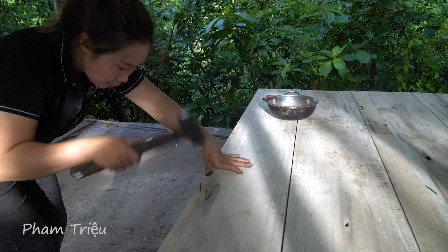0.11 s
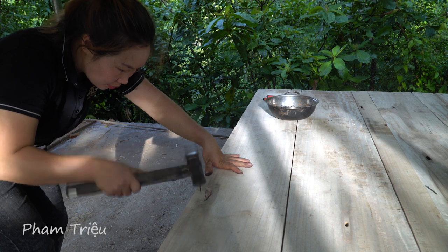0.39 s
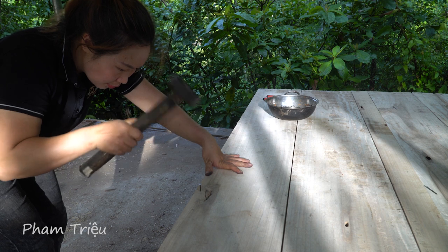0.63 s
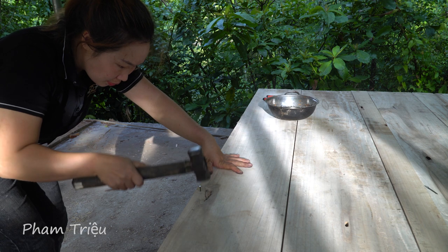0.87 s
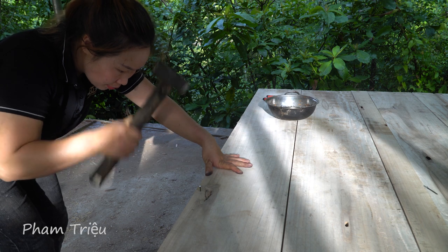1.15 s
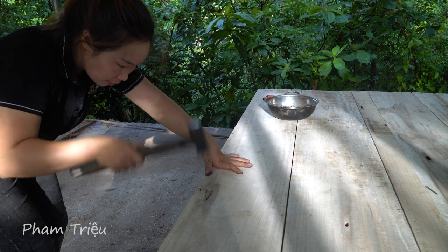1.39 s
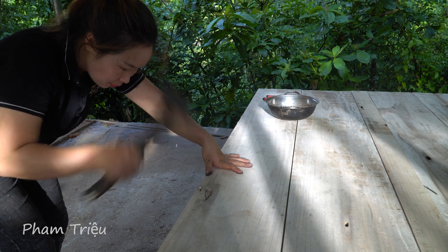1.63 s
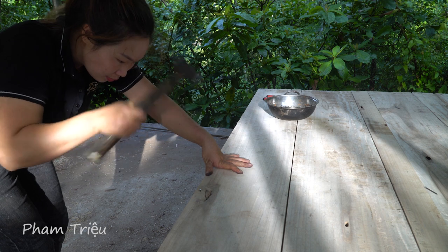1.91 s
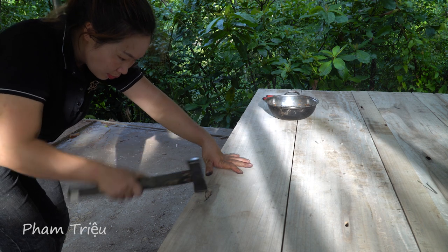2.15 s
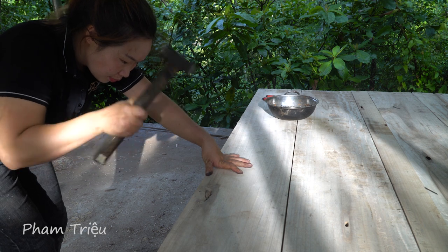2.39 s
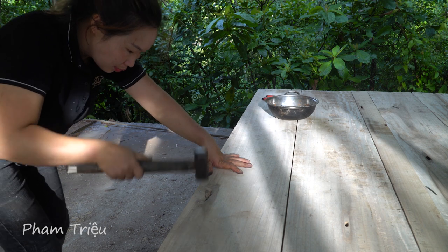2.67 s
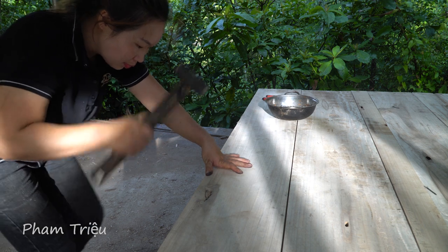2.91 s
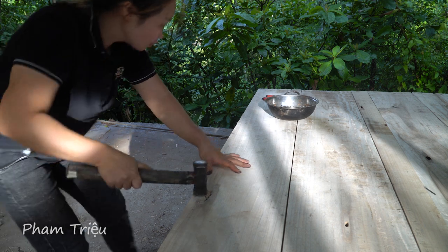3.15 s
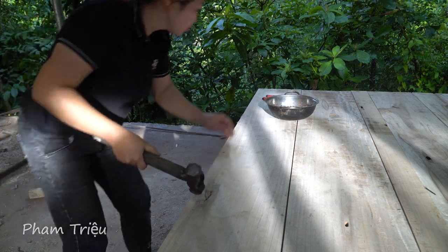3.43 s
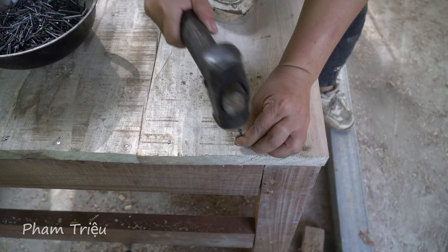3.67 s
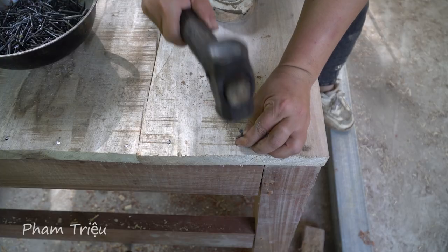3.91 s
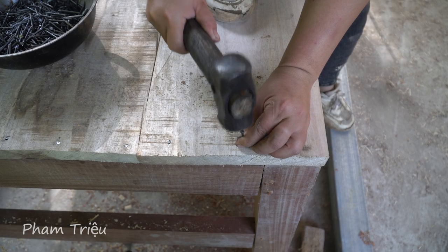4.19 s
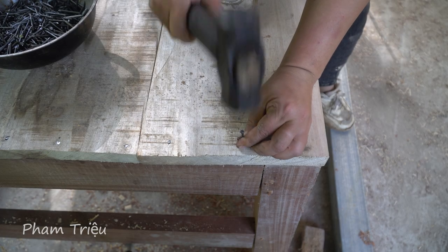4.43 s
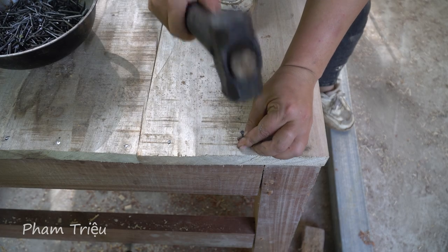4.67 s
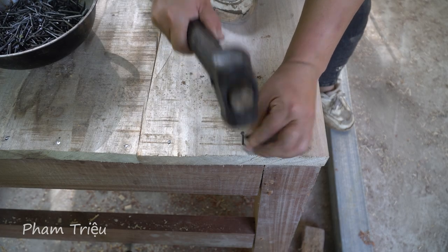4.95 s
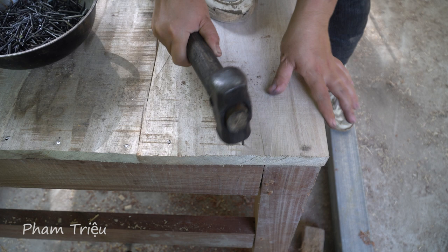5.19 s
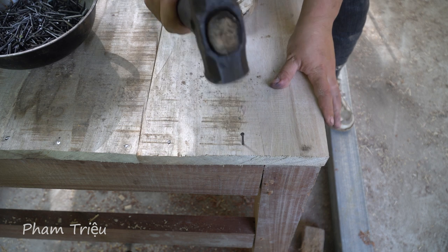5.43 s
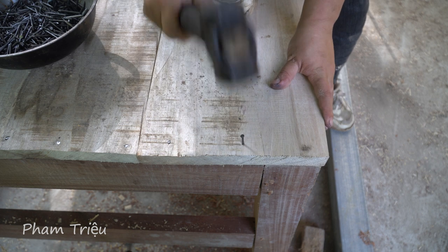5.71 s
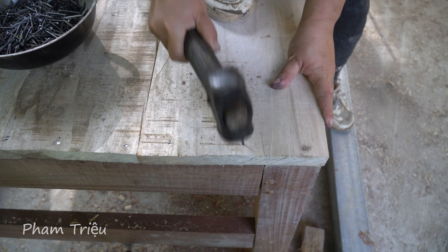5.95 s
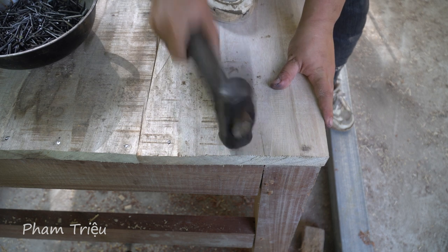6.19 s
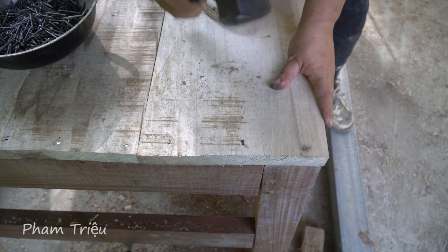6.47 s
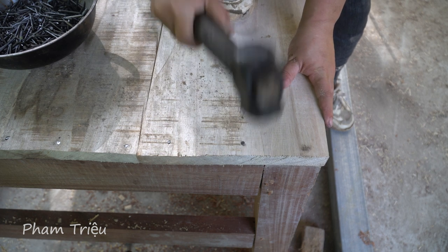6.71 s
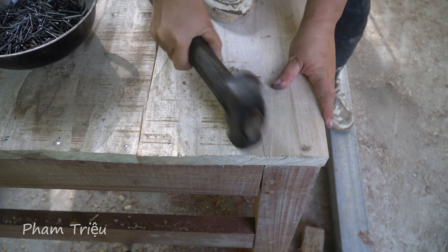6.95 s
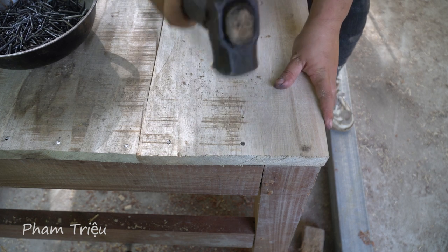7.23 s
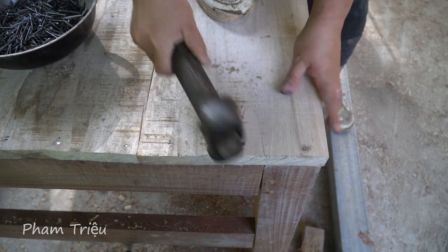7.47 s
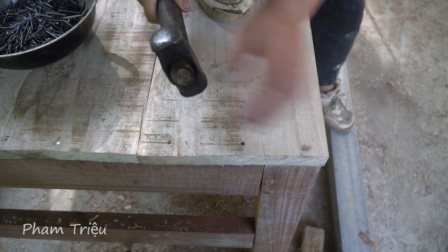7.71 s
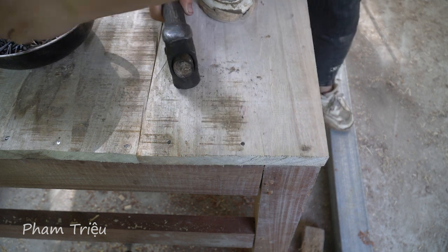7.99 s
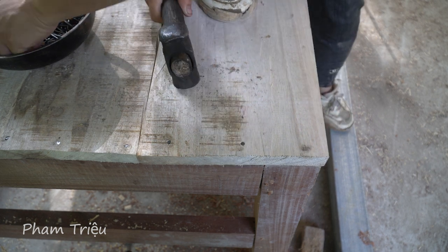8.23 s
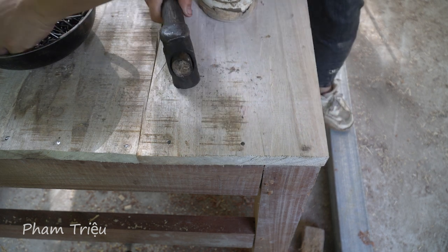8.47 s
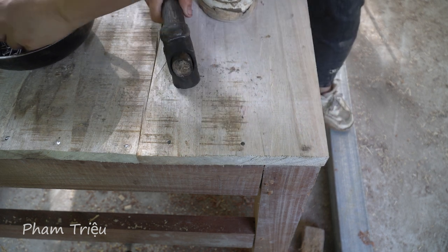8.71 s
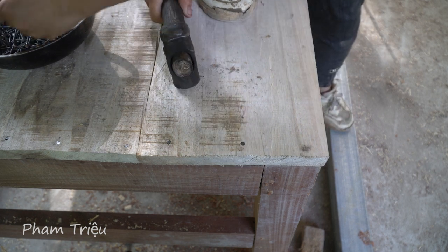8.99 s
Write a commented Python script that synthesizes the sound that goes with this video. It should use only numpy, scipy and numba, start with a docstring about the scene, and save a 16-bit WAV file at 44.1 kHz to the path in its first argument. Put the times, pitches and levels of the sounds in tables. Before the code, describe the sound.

Eight ringing hammer blows on loose wooden boards, heard from the side, each followed by a clattering shudder and bright nail jingle. A cut moves the microphone over another corner, where gentler, drier knocks drive one nail, finishing with two heavy distorted hits. Then a soft thud, near quiet, and tiny ticks and pings of nails being picked. Steady woodland and insect hiss underneath.

```python
"""A plank bench under trees, leaves and insects hissing throughout: at first the microphone stands at its side
and a heavy hammer drives nails; each blow rings steel and planks, then loose boards and a bowl of nails rattle.
From 3.7 s the microphone is above the far corner: light touches and softer blows, then two hard ones near 7 s.
The hammer is laid down with a dull thud near 7.9 s, and fingers pick through the nails: ticks, pings, soft raking.
Modes are decaying sines, rattles are uneven clicks, hiss is filtered noise; loud blows overload the input."""
import sys
import numpy as np
from scipy import signal
from scipy.io import wavfile
from numba import njit

SR = 44100
rng = np.random.default_rng(int(sys.argv[2]) if len(sys.argv) > 2 else 0)


def volts_from_decibels(level):
    """Turn decibel levels (scalar or array-like) into linear amplitude factors."""
    exponent = np.asarray(level, float) / 20
    return 10 ** exponent


def output_pcm(signal):
    """Save a mono or channel-first signal as 16-bit PCM at the path in sys.argv[1].

    Samples are clipped to [-1, 1] before scaling.
    """
    pcm = np.clip(np.atleast_2d(signal).T, -1, 1) * 32767
    wavfile.write(sys.argv[1], SR, np.round(pcm).astype(np.int16))


N = 401733
MOVE_S = 3.655  # the microphone is at the side before this, above the far corner after
NOW = np.arange(N) / SR
AT_SIDE = np.arange(N) < MOVE_S * SR
# columns of contacts()
TIME, FORCE, METAL, BRIGHT, LOOSE, LANDING, LASTING, WEIGHT = range(8)


def rms_one(x):
    """Scaled to rms 1."""
    return x / np.sqrt(np.mean(x ** 2) + 1e-20)


def at_hz(points, hz):
    """All columns of a table, read at one frequency."""
    rows = np.array(points, float)
    return [np.interp(np.log(hz), np.log(rows[:, 0]), column) for column in rows.T[1:]]


def clicks(times, sizes):
    """An impulse of the given size at each time."""
    out = np.full(N, 1e-18)
    out[np.round(np.asarray(times) * SR).astype(int)] = sizes
    return out


def ring(x, hz, t60):
    """A resonator: a unit click sets a sine of height 1 ringing."""
    radius = volts_from_decibels(-60 / (t60 * SR))
    w = 2 * np.pi * hz / SR
    return signal.lfilter([0, np.sin(w)], [1, -2 * radius * np.cos(w), radius * radius], x)


def bands(x):
    """Yields centre and content of each half-octave band, neighbours from unrelated rows of x."""
    edges = 22 * 2 ** np.arange(0, 9.8, .5)
    for k, (low, high) in enumerate(zip(edges, edges[1:])):
        sos = signal.butter(2, [low, high], "band", fs=SR, output="sos")
        yield np.sqrt(low * high), signal.sosfilt(sos, x[k % 2])


def shapes(sizes, shape):
    """One envelope per contact, each a function of the time since it fell."""
    out = np.zeros(N)
    t = np.arange(SR // 40) * 40 / SR  # coarse steps, interpolated below
    for k, row in enumerate(contacts()):
        at = round(row[TIME] * SR)
        since = np.arange(min(SR, N - at)) / SR
        out[at:at + SR] += sizes[k] * np.interp(since, t, shape(t, row))
    return out


def brightness(rows, hz):
    """A harder contact lifts the treble, a heavier one the bass, in dB."""
    treble = rows[:, BRIGHT] * np.log2(max(hz, 250) / 500)
    return treble + rows[:, WEIGHT] * np.log2(250 / min(hz, 250))


def swells(rows):
    """Whatever lies loose jumps at each contact and lands a little later."""
    def jump(t, row):
        ratio = t / row[LANDING]
        return (ratio * np.exp(1 - ratio)) ** 2.4
    return shapes(volts_from_decibels(rows[:, FORCE] + rows[:, LOOSE]), jump)


def struck(modes, rows, db, spread_db, lasting, rise_s):
    """Each contact sets every mode ringing with a strength of its own."""
    out, t = np.zeros(N), np.arange(SR // 2) / SR
    chance = rng.standard_normal((len(rows), len(modes)))
    for k, (hz, level_db, t60) in enumerate(modes):
        sizes = volts_from_decibels(db + level_db + brightness(rows, hz) + spread_db * chance[:, k])
        rise = 1 - np.exp(-t / rise_s)  # bending waves take time to spread
        wave = (-1) ** k * np.sin(2 * np.pi * hz * t) * rise
        for s, size, last in zip(rows[:, TIME], sizes, lasting):
            at, long = round(s * SR), min(int(t60 * last * SR), len(t))
            out[at:at + long] += size * wave[:long] * volts_from_decibels(-60 * t[:long] / (t60 * last))
    return out


# full hammer blows: (time [s], force [dB], steel over force [dB], brightness [dB per octave], ring-out factor)
FULL_BLOWS = [(.055, -11, 11.5, -0.8, 0.67), (.497, -14, 18, -1.2, 0.67), (0.908, -13, 17.5, -1.1, 0.59),
              (1.349, -8, 6, -0.2, 0.3), (1.780, -6, 10, -1.9, 0.3), (2.214, -6.5, 0, -1, 0.32),
              (2.651, -3, 2.5, -1.4, 0.45), (3.101, -3.5, -3, -0.7, 0.53), (4.575, -21.5, 17.5, -0.6, 0.91),
              (4.905, -20, 16, .1, 0.82), (5.258, -19.5, 12.5, 1.35, 0.81), (5.603, -20.5, 17.5, 1.8, 0.69),
              (5.941, -15, 19.5, 0.9, 0.72), (6.290, -13.5, 21, 1.5, 0.72), (6.641, -14, 21, 1.2, 0.7),
              (7.010, -3, 7, 1.7, 0.33), (7.411, -5.5, 13, 0.2, 0.66)]
# light touches that set the nail, bounce, or lay the hammer down: (time [s], force [dB],
# steel over force [dB], brightness [dB per octave], ring-out factor)
LIGHT_TOUCHES = [(3.836, -32.5, 12.5, -3.5, 0.61), (4.215, -20.5, 15.5, -1, 0.69),
                 (5.640, -21.5, 13, -3.5, 0.38), (5.973, -26, 17, -2.5, 0.31),
                 (7.0752, -12, 18, -1.5, 0.64), (7.9285, -22.5, -30, -11, 0.3),
                 (7.987, -38.5, -25, -11.5, 0.6)]


def contacts():
    """Every touch of the hammer; its force and hardness set the rattle, landing delay and bass weight."""
    s, force_db, steel_db, bright, lasting = np.transpose(FULL_BLOWS + LIGHT_TOUCHES)
    place = (s > MOVE_S).astype(int)  # picks from the pairs (side, above)
    full = np.arange(len(s)) < len(FULL_BLOWS)
    # rattle in dB over the force; softer touches shake less
    full_db = np.take((-20.5, -24.5), place) + (np.take((.3, 0), place) - 1) * force_db
    light_db = -19 + 2.1 * bright
    rattle_db = np.where(full, full_db, light_db)
    landing_s = .089 + .0017 * force_db  # loose things land later after a harder blow
    # bass weight in dB per octave: shrinks as force grows; a soft contact moves the bench less
    weight = np.take((-3.8, -2.9), place) + np.take((-.33, -.14), place) * force_db + .25 * bright
    return np.transpose([s, force_db, steel_db, bright, rattle_db, landing_s, lasting, weight])


# hammer head and nail, heard from the side: (frequency [Hz], relative level [dB], t60 [s])
STEEL_FROM_SIDE = [(460, -7, .03), (640, -9, .11), (830, -7, .03), (1215, -1.5, .035), (1550, -7, .03),
                   (2620, -13, .025), (3600, -19, .03), (8940, -34, .05)]
# hammer head and nail, heard from above: (frequency [Hz], relative level [dB], t60 [s])
STEEL_FROM_ABOVE = [(655, -17, 0.047), (1060, 0, 0.028), (1815, -4, 0.023), (2168, -8.5, 0.024),
                    (3360, -20.5, 0.039), (5670, -22, .03), (8940, -36.5, 0.042)]


def steel():
    """Head and nail ring briefly over a noise crack of a few milliseconds."""
    rows, rings = contacts(), 0
    beside, above = rows[rows[:, TIME] < MOVE_S], rows[rows[:, TIME] > MOVE_S]
    for modes, here in ((STEEL_FROM_SIDE, beside), (STEEL_FROM_ABOVE, above)):
        db = here[:, FORCE] + here[:, METAL]
        rings = rings + struck(modes, here, db, spread_db=1.5, lasting=np.ones(len(here)), rise_s=.0006)
    crack_db = rows[:, FORCE] + rows[:, METAL] - 14 + brightness(rows, 2000)
    crack = shapes(volts_from_decibels(crack_db), lambda t, row: np.exp(-t / 0.0022))
    noise = signal.lfilter([1, -1], [1, -1.3, .45], rng.standard_normal(N))
    return rings + crack * rms_one(noise)


# plank modes, heard from the side: (frequency [Hz], relative level [dB], t60 before ring-out factor [s])
PLANKS_FROM_SIDE = [(70, -8.5, 1), (121.9, -3.5, 0.49), (170.6, -5, 0.25), (229.2, -2.5, 0.28),
                    (268.9, -3.5, 0.51), (298.2, -4.5, 0.62), (324, -15, 0.26), (454.5, -2.5, 0.37),
                    (480, -2, 0.38), (547, 3.5, 0.19), (581, -7.5, .25), (621.6, -2.5, .25),
                    (697, -0.5, 0.13), (778, -12, 0.1), (852, -2, 0.21), (1002, -10, 0.082),
                    (1175, -13, .2), (1305, -2.5, 0.1)]
# plank modes, heard from above: (frequency [Hz], relative level [dB], t60 before ring-out factor [s])
PLANKS_FROM_ABOVE = [(31.3, -7, 0.84), (118.2, -5.5, 0.36), (167.5, -.5, 0.38), (186, -1.5, 0.38),
                     (260, -16.5, 0.12), (304, -6.5, 0.14), (365.7, 2.5, 0.17), (409, -3.5, 0.21),
                     (449.3, -3.5, 0.31), (551, -8, .2), (689, -12.5, 0.29), (794, -11, 0.17),
                     (893, -3, 0.4), (956, -3, 0.3), (1048, -9, 0.47), (1123, -3, 0.22), (1227, -8, 0.11),
                     (1408, -4.5, 0.15)]
# face of the head meeting the wood on hard blows: (frequency [Hz], relative level [dB], t60 [s])
FACE_ON_WOOD = [(489, -7.5, 0.18), (562, -6.5, .15), (635.3, -4, .15), (688, -5, 0.2), (785.5, -10, 0.15)]
# hammer laid flat on the bench: (frequency [Hz], relative level [dB], t60 [s])
LAID_THUD = [(175, -1, .08), (340, -3, .07), (800, 6, .07)]
# soft bumps on the bench: (time [s], level before each mode's own [dB])
SOFT_BUMPS = [(8.35, -61), (8.539, -59), (8.821, -57.5)]


def planks():
    """The blow rings the plank modes of its place; boards landing again keep knocking them."""
    rows, out = contacts(), np.zeros(N)
    knocks = volts_from_decibels(-13.5) * swells(rows) * (rng.random(N) < 130 / SR)  # 130 knocks per second
    bump_s, bump_db = np.transpose(SOFT_BUMPS)
    bumps = clicks(bump_s, volts_from_decibels(bump_db))
    face_db = 1.62 * rows[:, FORCE] + 3  # grows faster than the force
    out += struck(FACE_ON_WOOD, rows, face_db, spread_db=6, lasting=np.ones(len(rows)), rise_s=.0034)
    laid = rows[rows[:, TIME] > 7.8]
    out += struck(LAID_THUD, laid, laid[:, FORCE], spread_db=1.2, lasting=np.ones(len(laid)), rise_s=.0006)
    touch = rng.standard_normal(N)
    for modes, here in ((PLANKS_FROM_SIDE, AT_SIDE), (PLANKS_FROM_ABOVE, ~AT_SIDE)):
        out += here * struck(modes, rows, rows[:, FORCE] - 6, spread_db=2.5, lasting=rows[:, LASTING], rise_s=.003)
        for k, (hz, level_db, t60) in enumerate(modes):
            # shifted so that each mode takes knocks of other strengths; bumps are dull
            strikes = knocks * np.roll(touch, 977 * k) + bumps * 300 / max(hz, 300)
            out += here * volts_from_decibels(level_db) * ring(here * strikes + 1e-18, hz, t60)
    return out


# dense ring-out of bench, ground and trees: (frequency [Hz], level over force from the side [dB],
# level over force from above [dB], t60 before ring-out factor [s])
DENSE_MODES = [(28.9, -14, -35, 0.89), (50, -31, -32, 0.5), (65, -20, -29.5, 1), (157, -12.5, -17.5, 0.77),
               (287, -10.5, -8.5, .55), (556, -7.5, -14.5, 0.73), (1250, -8, -13, 0.66),
               (2590, -8.5, -13, .4), (4800, -13.5, -25.5, 0.6), (9600, -18, -41, 0.13),
               (15800, -27, -47, 0.12)]


def ring_out():
    """Modes too dense to count: noise that dies band by band, the lows building up later."""
    rows, out = contacts(), 0
    for hz, noise in bands(rng.standard_normal((2, N))):
        side_db, above_db, t60 = at_hz(DENSE_MODES, hz)
        place_db = np.where(rows[:, TIME] < MOVE_S, side_db, above_db)
        db = rows[:, FORCE] + place_db + brightness(rows, hz)

        def dying(t, row):
            return (1 - np.exp(-t * hz * 1.1)) * volts_from_decibels(-60 * t / (t60 * row[LASTING]))
        out = out + rms_one(noise) * shapes(volts_from_decibels(db), dying)
    return out


# colour of loose boards and nails: (frequency [Hz], relative level from the side [dB],
# relative level from above [dB])
RATTLE_COLOUR = [(151, -3.5, -11.5), (390, 0.5, -8), (1040, -5.5, -8), (2400, -13, -9.5), (4940, -9, -14.5),
                 (9100, -11.5, -33), (13000, -25, -44), (16000, -20, -42)]


def rattle():
    """Loose boards and nails jump and land: a swell of uneven clicks some time after the blow."""
    rows, out = contacts(), 0
    sizes = volts_from_decibels(2.5 * np.minimum(rng.exponential(1, (2, N)), 5)) * rng.choice([-1, 1], (2, N))
    grains = sizes * (rng.random((2, N)) < 2600 / SR) + 1e-18  # 2600 clicks per second
    for hz, band in bands(grains):
        side_db, above_db = at_hz(RATTLE_COLOUR, hz)
        if hz > 120:
            out = out + rms_one(band) * np.where(AT_SIDE, volts_from_decibels(side_db), volts_from_decibels(above_db))
    # level wanders at random, 90 new values per second
    clumps = volts_from_decibels(3 * np.interp(NOW * 90, np.arange(900), rng.standard_normal(900)))
    return volts_from_decibels(-8.5) * swells(rows) * clumps * out


# the bowl of nails lands with a bright jingle: (time [s], level [dB])
BOWL_LANDINGS = [(.125, -28), (.180, -36), (.566, -40), (.592, -40), (.978, -29), (1.027, -37),
                 (1.418, -27), (1.467, -30), (1.847, -30), (1.882, -32), (1.959, -32), (2.258, -28),
                 (2.396, -33), (2.445, -43), (2.694, -31), (2.752, -31), (2.808, -32), (3.195, -30),
                 (3.284, -34), (6.251, -52)]


def bowl():
    """Each landing of the bowl is a short decaying burst of noise above 4 kHz."""
    s, db = np.transpose(BOWL_LANDINGS)
    decay_s = .007
    burst = signal.lfilter([1], [1, -np.exp(-1 / (decay_s * SR))], clicks(s, volts_from_decibels(db)))
    sos = signal.butter(2, 4000, "high", fs=SR, output="sos")
    return burst * rms_one(signal.sosfilt(sos, rng.standard_normal(N)))


# nails clink in the bowl: (time [s], tick level [dB], ring frequency [Hz])
NAIL_CLINKS = [(8.322, -58, 8000), (8.338, -56, 12500), (8.382, -50, 2400), (8.409, -56, 3000),
               (8.432, -56, 8600), (8.549, -56, 12800), (8.559, -51, 3400), (8.620, -36, 4000),
               (8.631, -50, 3600), (8.642, -39, 7450), (8.675, -56, 4030), (8.697, -52, 3900),
               (8.712, -60, 12000)]
# longer pings of the bowl: (time [s], level [dB], frequency [Hz], t60 [s])
BOWL_PINGS = [(8.119, -54, 5300, .07), (8.697, -51, 7600, .12)]
# fingers rake through the nails: (time of the peak [s], level [dB])
FINGER_RAKES = [(8.342, -57), (8.362, -55), (8.432, -49.5), (8.556, -54), (8.628, -55)]


def nails():
    """Each clink is a bright tick with a short ring; the bowl pings; raking fingers drag dense dull grains."""
    out, t = np.zeros(N), np.arange(SR // 10) / SR

    def tone(db, hz, t60):
        return volts_from_decibels(db - 60 * t / t60) * np.sin(2 * np.pi * hz * t)
    for s, db, hz in NAIL_CLINKS:
        noise = rng.standard_normal(len(t)) * np.exp(-t / 0.0022)
        tick = volts_from_decibels(db) * signal.lfilter([1, -.3], [1, -.45], noise)
        at = round(s * SR)
        out[at:at + len(t)] += tick + tone(db - 10, hz, .022)
    for s, db, hz, t60 in BOWL_PINGS:
        at = round(s * SR)
        out[at:at + len(t)] += tone(db, hz, t60)
    grains = rng.standard_normal(N) * (rng.random(N) < 7000 / SR)  # 7000 grains per second
    drag = signal.sosfilt(signal.butter(1, [330, 2600], "band", fs=SR, output="sos"), grains)
    rise, fall = 280, 700  # dB per second
    level = 0
    for s, db in FINGER_RAKES:
        level = level + volts_from_decibels(db - np.where(NOW < s, rise * (s - NOW), fall * (NOW - s)))
    return out + level * rms_one(drag)


# colour of the woodland hiss at the side: (frequency [Hz], relative level [dB per Hz])
WOODS_FROM_SIDE = [(15, -10), (30, 21), (90, 24), (200, 5), (500, 14), (1300, 5), (2600, -4), (5000, -11),
                   (6200, -26), (10000, -28), (13000, -42), (16000, -52), (22000, -90)]
# colour of the woodland hiss above the corner: (frequency [Hz], relative level [dB per Hz])
WOODS_FROM_ABOVE = [(15, -10), (30, 7), (90, 9), (200, 3), (500, 3.5), (1300, -1), (2600, -5.5), (5000, -7),
                    (6200, -23), (10000, -23), (13000, -29), (16000, -46), (22000, -90)]
# one cricket near by, heard at the side: (time [s], level [dB])
NEAR_CRICKET = [(0, -72), (2.1, -73), (2.3, -84), (3.6, -87)]
# insect choruses: (low edge [Hz], high edge [Hz], level from the side [dB], level from above [dB])
INSECT_BANDS = [(3620, 4560, -67.5, -69.5), (6400, 8400, -68, -65.5), (8340, 9730, -71, -68.5)]


def woods():
    """Smooth leaf hiss coloured by where the microphone stands, with a cricket and insect bands of noise."""
    beside, above = 0, 0
    for hz, noise in bands(rng.standard_normal((2, N))):
        beside = beside + noise * volts_from_decibels(at_hz(WOODS_FROM_SIDE, hz)[0])
        above = above + noise * volts_from_decibels(at_hz(WOODS_FROM_ABOVE, hz)[0])
    out = np.where(AT_SIDE, volts_from_decibels(-48) * rms_one(beside), volts_from_decibels(-55.5) * rms_one(above))
    s, db = np.transpose(NEAR_CRICKET)
    cricket = ring(ring(rng.standard_normal(N), 5510, .02), 5510, .02)  # noise through two resonators
    out += AT_SIDE * volts_from_decibels(np.interp(NOW, s, db)) * rms_one(cricket)
    for low, high, side_db, above_db in INSECT_BANDS:
        sos = signal.butter(4, [low, high], "band", fs=SR, output="sos")
        chorus = rms_one(signal.sosfilt(sos, rng.standard_normal(N)))
        out += np.where(AT_SIDE, volts_from_decibels(side_db), volts_from_decibels(above_db)) * chorus
    return out


def scene():
    """All sources at one microphone."""
    return (steel() + planks() + ring_out() + rattle() + bowl() + nails() + woods())[None]


@njit
def compress(x, knee, squeeze, attack, release):
    """A power follower turns the gain down above the knee."""
    out, power = np.empty_like(x), 0.
    for i in range(len(x)):
        now = x[i] ** 2
        power += (attack if now > power else release) * (now - power)
        out[i] = x[i] * (max(np.sqrt(power), knee) / knee) ** -squeeze
    return out


def roll_off(x):
    """The treble ends steeply here."""
    return signal.sosfilt(signal.butter(12, 16470, fs=SR, output="sos"), x)


def record(dry):
    """The input stage clips flat; gain control then catches up within milliseconds and lets go again."""
    top = volts_from_decibels(-9)
    flat = np.clip(dry[0], -top, top)
    coupled = signal.lfilter(*signal.butter(1, 30, "high", fs=SR), flat)  # flat tops sag
    attack_s, release_s = .009, .012
    held = compress(coupled, volts_from_decibels(-22), .72, 1 / (attack_s * SR), 1 / (release_s * SR))
    mix = np.clip(volts_from_decibels(11) * held, -1, 1)[None]
    return roll_off(mix)


dry = scene()
out = record(dry)
output_pcm(out)
```